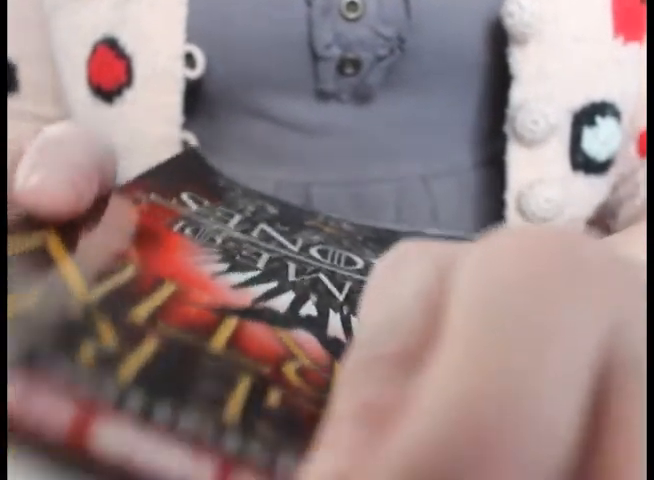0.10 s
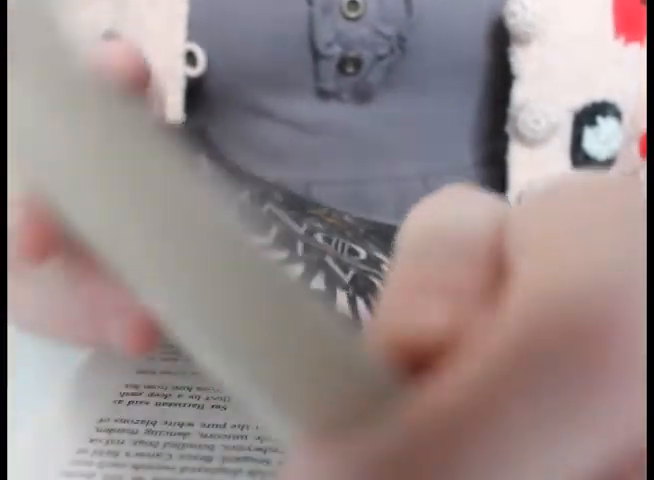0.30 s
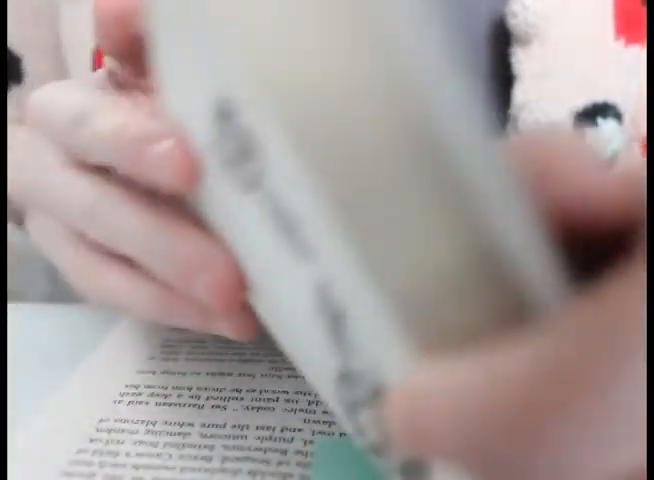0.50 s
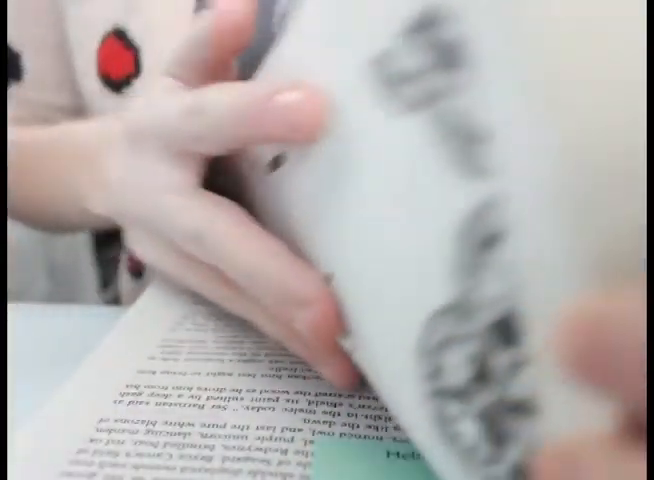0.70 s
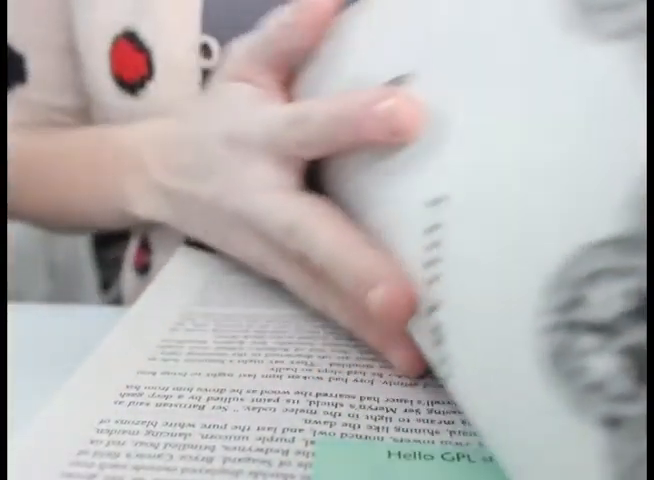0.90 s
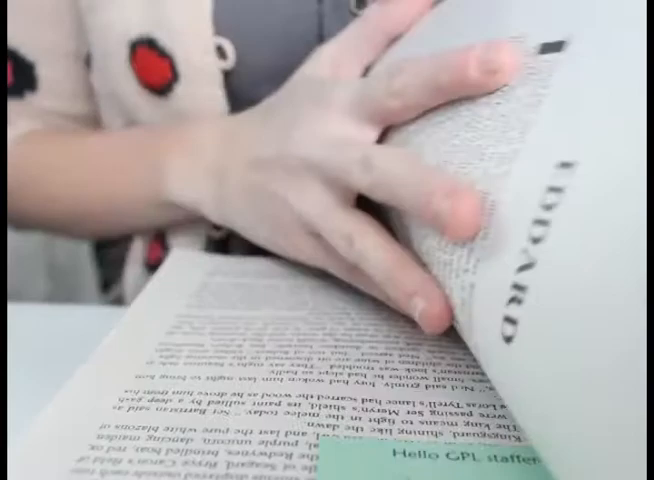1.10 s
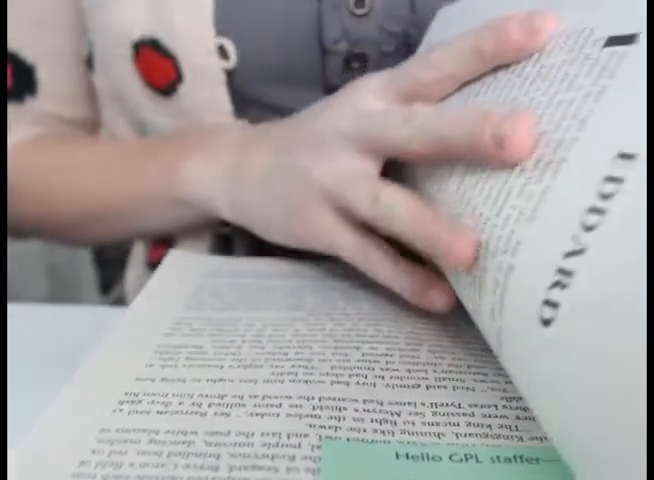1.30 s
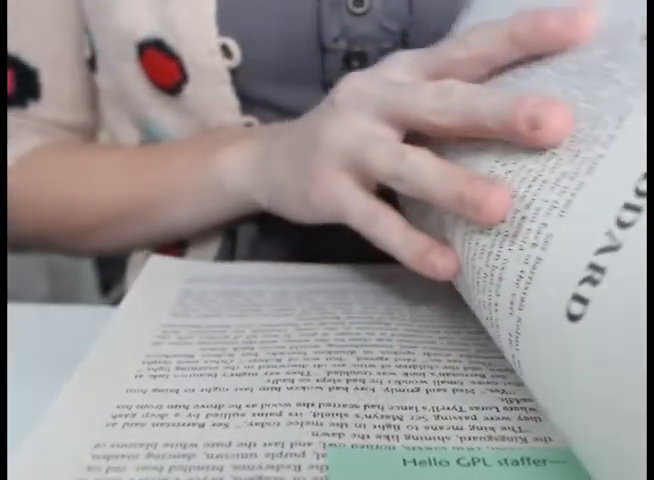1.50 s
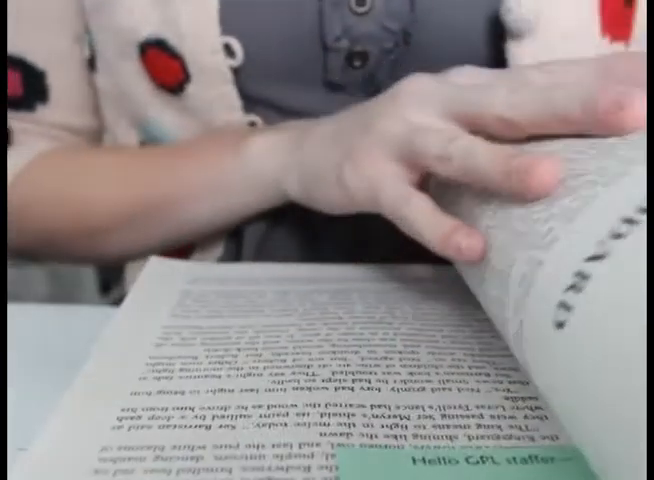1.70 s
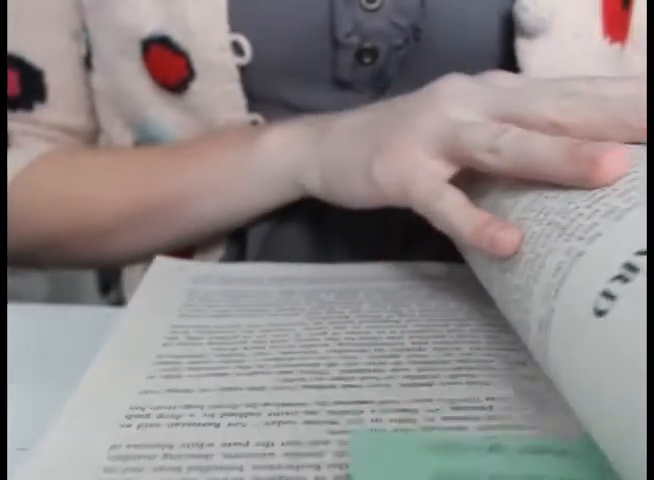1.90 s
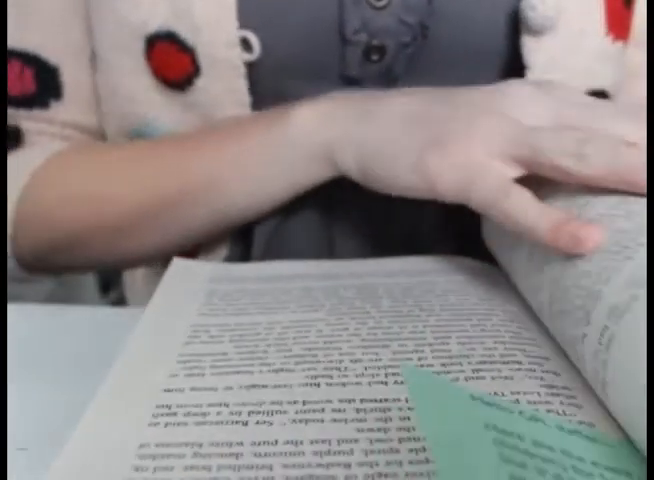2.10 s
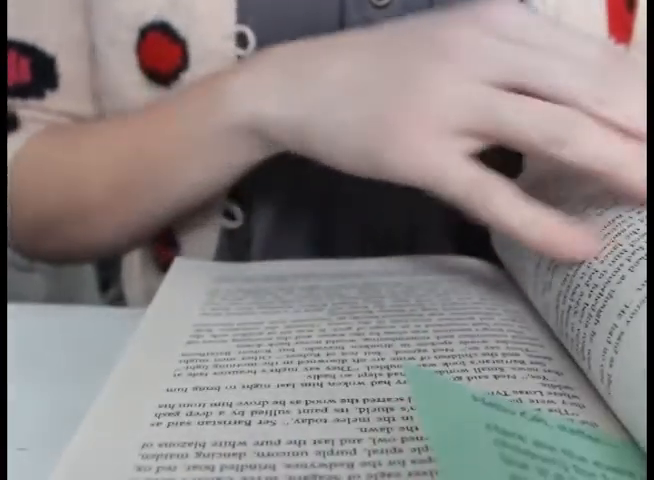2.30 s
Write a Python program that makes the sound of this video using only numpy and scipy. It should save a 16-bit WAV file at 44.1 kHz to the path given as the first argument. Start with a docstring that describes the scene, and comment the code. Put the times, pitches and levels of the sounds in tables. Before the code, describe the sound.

Book pages being turned and smoothed: an early sharp papery clack with a tiny squeak, then grainy sliding strokes, a low thud midway, small taps and a brief edge scrape, over faint steady room noise, close microphone.

```python
"""A quiet room, close to one microphone: a paperback is opened and leafed through.
Fingers and pages slide in soft strokes of grainy noise; page edges scrape as chattering noise bursts.
Taps ring as damped sines with a noise crush, creases tick, and a thin squeak glides down.
Settling pages puff out low noise; a short room tail and a steady noise floor lie behind it all."""
import sys
import numpy as np
from scipy import signal
from scipy.fft import rfft, irfft, next_fast_len
from scipy.io import wavfile
from scipy.ndimage import map_coordinates

SR = 44100
rng = np.random.default_rng(int(sys.argv[2]) if len(sys.argv) > 2 else 0)


def persist_wave(psi):
    """Save psi, clipped to +-1, as 16-bit WAV."""
    counts = np.round(np.clip(psi, -1, 1) * 32767).astype(np.int16)
    wavfile.write(sys.argv[1], SR, np.atleast_2d(counts).T)


N = 103635  # samples, 2.35 s


def amp(db):
    """Decibels to gain."""
    return 10 ** (np.asarray(db) / 20)


def unit(x):
    """Scale to rms 1."""
    return x / np.sqrt(np.mean(x ** 2) + 1e-20)


def filtered(x, response):
    """Shape the spectrum of x with a gain that depends on frequency."""
    m = next_fast_len(N + 8192)
    gain = response(np.fft.rfftfreq(m, 1 / SR))
    return irfft(rfft(x, m) * gain, m)[:N]


def coloured(x, points, tilt_db=0):
    """EQ x along (f/Hz, level/dB) points, tilted in dB per octave, at rms 1; the ends roll off."""
    f, db = np.transpose(points)
    octaves = np.log2(np.r_[f[0] / 2, f, f[-1] * 2])
    db = np.r_[db[0] - 20, db, db[-1] - 20] + tilt_db * octaves

    def response(hz):
        """Straight lines between the points on an octave scale, silent outside."""
        return amp(np.interp(np.log2(hz + 1), octaves, db, left=-300, right=-300))

    return unit(filtered(x, response))


def noise():
    """Plain white noise."""
    return rng.standard_normal(N)


def wobble(rate):
    """A smooth random curve, rate knots a second."""
    knots = rng.standard_normal(int(N * rate / SR) + 4)
    return map_coordinates(knots, [np.arange(N) * rate / SR])


def since(s):
    """Seconds since s, zero before it."""
    return np.maximum(np.arange(N) / SR - s, 0)


def swell(s, rise, hold, fall):
    """Rise, hold and fall of a movement, in straight lines."""
    corners = s + np.cumsum([0, rise, hold, fall])
    return np.interp(np.arange(N) / SR, corners, [0, 1, 1, 0])


def dying(t, t60):
    """Free decay from a contact: 60 dB down after t60 seconds."""
    return (t > 0) * amp(-60 * t / t60)


def ring(t, hz, t60, rise_cycles):
    """One damped mode with a soft start."""
    soft_start = 1 - np.exp(-t * hz / rise_cycles)
    return np.sin(2 * np.pi * hz * t) * dying(t, t60) * soft_start


GRAINS_PER_S, GRAIN_SPREAD_DB = 2000, 2.5
GRAIN_SHARE = 0.38  # part of the power before colouring


def friction():
    """Paper fibres catching at random, over a smooth rush."""
    chance, size, rush = rng.random(N), noise(), rng.standard_normal((2, N))
    caught = chance < GRAINS_PER_S / SR
    catches = caught * amp(GRAIN_SPREAD_DB * size) * np.sign(rush[0])
    return np.sqrt(GRAIN_SHARE) * unit(catches) + np.sqrt(1 - GRAIN_SHARE) * rush[1]


# strokes of fingers and pages: start t/s, rise t/s, hold t/s, fall t/s,
# hollow rub level/dB, paper hiss level/dB, fine fizz level/dB, hiss tilt [dB per octave]
STROKES = [(0.147, 0.088, .15, 0.094, -51.5, -45, -59.5, -3), (0.398, 0.053, 0.18, .12, -51.5, -47, -60, 1),
           (0.597, 0.078, 0.046, .08, -48.5, -47.5, -54, 2.5),
           (0.688, 0.077, 0.058, 0.17, -43, -37, -52.5, -1.4),
           (0.78, .06, 0.043, 0.14, -46.5, -42.5, -57, 3.2),
           (0.966, 0.096, 0.044, 0.086, -45.5, -44.5, -50.5, -0.5),
           (1.11, 0.091, 0.11, 0.22, -69, -45.5, -52, 0.5), (1.246, 0.079, 0.069, 0.02, -39, -50, -57, 1),
           (1.381, 0.056, 0.024, 0.044, -42, -41.5, -52, -0.5),
           (1.464, .03, 0.075, .06, -52, -53.5, -65, -1.5), (1.576, 0.039, 0.017, 0.046, -39, -38, -52, -3),
           (1.594, 0.073, .04, 0.066, -48.5, -42.5, -52.5, 1),
           (1.73, 0.041, 0.048, 0.081, -65, -51, -70, 0), (1.863, 0.036, 0.015, 0.047, -40.5, -41, -64, -5),
           (1.955, 0.085, 0.075, 0.068, -53.5, -49, -56, 0),
           (2.103, 0.043, 0.031, 0.062, -47, -51, -62, -2), (2.287, 0.025, .06, .05, -49, -49.5, -65, 3.5)]
# spectra of the hollow book, the sheet and the fine fizz: f/Hz, level/dB
RUB_SPECTRUM = [(76, -32), (130, -18), (216, -32), (273, -7), (323, -5.5), (488, -4), (632, -3.5), (710, 0),
                (834, -6), (945, -14), (1100, -12), (1430, -13), (2420, -120)]
HISS_SPECTRUM = [(600, -41), (950, -13), (1300, -4), (1550, 0), (2100, -3), (2700, -0.5), (3300, -5),
                 (4300, -5.5), (5500, -11.5), (7500, -24), (14000, -29.5)]
FIZZ_SPECTRUM = [(2500, -12), (5000, -1.5), (7500, 1), (10000, -5.5), (15500, -5.5)]
UNEVEN_DB, UNEVEN_RATE = 1, 55.12  # unsteady finger pressure, knots a second


def slides():
    """Each stroke drives the hollow book, the sheet's hiss and a fine fizz."""
    rub = coloured(friction(), RUB_SPECTRUM)
    fizz = coloured(friction(), FIZZ_SPECTRUM)
    rub_power, fizz_power, hiss = np.zeros((3, N))
    for s, rise, hold, fall, rub_db, hiss_db, fizz_db, tilt in STROKES:
        speed = swell(s, rise, hold, fall)
        # overlapping strokes add in power where they share one noise
        rub_power += (speed * amp(rub_db)) ** 2
        fizz_power += (speed * amp(fizz_db)) ** 2
        hiss += speed * amp(hiss_db) * coloured(friction(), HISS_SPECTRUM, tilt)
    strokes = np.sqrt(rub_power) * rub + hiss + np.sqrt(fizz_power) * fizz
    return strokes * amp(UNEVEN_DB * wobble(UNEVEN_RATE))


# page edges scraping, then slipping free:
# start t/s, rise t/s, hold t/s, fall t/s, level/dB, tilt [dB per octave]
EDGE_SCRAPES = [(0.227, .007, .003, 0.014, -47, 5), (0.271, 0.011, 0.0062, 0.0022, -31, -3),
                (1.881, 0.046, .01, 0.043, -41, 3), (1.911, 0.0087, .003, 0.018, -34, -2),
                (1.923, 0.015, 0.0093, 0.0069, -34.5, -5), (1.946, 0.0055, .002, 0.0053, -38, 4),
                (1.951, 0.0074, 0.0053, 0.019, -46, -5)]
# spectrum of a scraping edge: f/Hz, level/dB
EDGE_SPECTRUM = [(600, -6.5), (1500, -9.5), (2300, -1.5), (3100, -7), (4300, 4), (5500, -2.5), (6700, 3.5),
                 (8500, -3.5), (11000, -7), (15500, -6)]


def scrapes(chatter_db=2.15, chatter_rate=600):
    """Page edges stick and slip until they come free: noise with a fast random chatter in level."""
    out = np.zeros(N)
    for s, rise, hold, fall, db, tilt in EDGE_SCRAPES:
        level = amp(db + chatter_db * wobble(chatter_rate))
        out += swell(s, rise, hold, fall) * level * coloured(noise(), EDGE_SPECTRUM, tilt)
    return out


# thin squeak of the glossy cover: start t/s, length t/s, start f/Hz, end f/Hz, width f/Hz, level/dB
COVER_SQUEAK = (.232, .028, 9300, 7700, 900, -45)


def squeak():
    """Rough, very fast slips whose rate falls as the cover slows: a narrow noise band gliding down."""
    s, length, start_hz, end_hz, width, db = COVER_SQUEAK
    hz = np.interp(since(s), [0, length], [start_hz, end_hz])
    roughness = wobble(2 * width) + 1j * wobble(2 * width)
    slips = np.real(roughness * np.exp(2j * np.pi * np.cumsum(hz) / SR))
    return amp(db) * unit(slips) * swell(s, length / 4, 0, 3 * length / 4)


# taps on cover and pages: t/s, level/dB, pitch f/Hz, t60 t/s, book ring level/dB, paper crush level/dB
PAPER_TAPS = [(0.2245, -13, 1590, 0.011, -22, -19.5), (.2335, -21.5, 650, 0.027, -35, -53),
              (.2368, -16.5, 660, 0.025, -44.5, -48), (0.2717, -22, 600, 0.015, -33, -33),
              (0.2884, -21.5, 1820, 0.011, -51, -31), (0.2987, -23.5, 406, 0.024, -39, -42),
              (0.3024, -25, 780, 0.011, -38, -39), (.79, -32, 1675, 0.041, -57, -36),
              (0.802, -28, 2030, 0.04, -54, -32.5), (.9462, -28, 622, 0.036, -43, -35),
              (0.9472, -37, 1450, 0.011, -53, -28), (.9555, -30, 597, .014, -45, -54),
              (1.0347, -13.5, 354, 0.024, -25.5, -62), (1.095, -33, 634, 0.04, -52, -44),
              (1.4455, -20, 600, 0.007, -48, -42), (1.4628, -16, 570, 0.011, -38, -28),
              (1.516, -27.5, 535, 0.012, -55, -57), (1.618, -33, 1370, 0.011, -43, -41),
              (1.903, -34, 735, 0.044, -50, -43), (1.910, -29.5, 729, 0.09, -51, -37),
              (1.9492, -24, 1970, 0.029, -43, -31.5), (1.994, -32, 650, .018, -60, -47),
              (2.219, -33.5, 600, 0.016, -60, -40)]
# modes of the whole book: f/Hz, level/dB, t60 t/s
BOOK_MODES = [(162, -9, 0.19), (240, -16, 0.047), (397, -14.5, 0.074), (501, -0.5, 0.064), (707, -10, 0.1)]
# spectrum of crushed paper: f/Hz, level/dB
CRUSH_SPECTRUM = [(200, 1.5), (600, 2.5), (1000, 3), (1700, 4.5), (2400, 4.5), (3500, -37), (6000, -26),
                  (15000, -31)]
CRUSH_RISE_S, CRUSH_T60_S = 0.00026, 0.024
CONTACT_CYCLES = 0.25
BOOK_RISE_CYCLES = 1  # the heavy block takes a moment to move


def taps():
    """A touched sheet rings for a few cycles, crushes a little and shakes the whole book."""
    out = np.zeros(N)
    for s, db, hz, t60, book_db, crush_db in PAPER_TAPS:
        t = since(s)
        sheet = ring(t, hz, t60, CONTACT_CYCLES)
        book = np.zeros(N)
        for f, level, decay in BOOK_MODES:
            varied = level + rng.normal(0, 1)  # each tap stirs the modes a little differently
            book += amp(varied) * ring(t, f, decay, BOOK_RISE_CYCLES)
        crush_shape = dying(t, CRUSH_T60_S) * (1 - np.exp(-t / CRUSH_RISE_S))
        crush = coloured(noise(), CRUSH_SPECTRUM) * crush_shape
        out += amp(db) * sheet + amp(book_db) * book + amp(crush_db) * crush
    return out


# crisp creases: t/s, level/dB
PAGE_CREASES = [(0.303, -37), (2.019, -39), (2.0935, -28)]
# spectrum of a crease: f/Hz, level/dB
CREASE_SPECTRUM = [(800, -35), (1500, -15), (2000, 14.5), (3200, -5), (5000, -0.5), (7000, -12),
                   (12000, -3.5), (16000, -17)]
CREASE_T60_S = 0.014


def creases():
    """A bent page gives way with crisp ticks of dying noise."""
    ticks = sum(amp(db) * dying(since(s), CREASE_T60_S) for s, db in PAGE_CREASES)
    return coloured(noise(), CREASE_SPECTRUM) * ticks


# air pushed out by settling pages: t/s, level/dB, centre f/Hz, length t/s
AIR_PUFFS = [(0.231, -39, 189, 0.035), (0.273, -47, 128, 0.054), (1.07, -54, 60, 0.087),
             (1.437, -45, 132, 0.043), (1.879, -38.5, 175, 0.046), (1.952, -39, 287, 0.032),
             (1.98, -51.5, 234, 0.14)]


def puffs(rise_share=0.16):
    """Soft low gusts from pages flopping over: noise around a low centre, quick up and slow down."""
    out = np.zeros(N)
    for s, db, hz, length in AIR_PUFFS:
        air = coloured(noise(), [(hz / 2, -9), (hz, 0), (hz * 2, -14)])
        out += amp(db) * swell(s, rise_share * length, 0, (1 - rise_share) * length) * air
    return out


ROOM_T60_S, ROOM_DB = 0.27, -18


def room(x):
    """The short answer of a furnished room: a dying noise tail that starts 4 ms late."""
    tail = coloured(noise(), [(100, -1), (2000, 12.5), (15000, -7)]) * dying(since(.004), ROOM_T60_S)
    return signal.fftconvolve(x, tail / np.linalg.norm(tail))[:N]


# spectrum of the steady background: f/Hz, level/dB
FLOOR_SPECTRUM = [(12, -18), (20, -5.5), (187, -5), (399, 1), (542, 1), (678, -4), (897, -2.5), (1000, -5),
                  (1660, -8.5), (2200, -5), (2750, -10.5), (3950, -11), (14700, -23), (16000, -17.5)]
FLOOR_DB = -50.5


def floor():
    """The steady noise under everything."""
    return amp(FLOOR_DB) * coloured(noise(), FLOOR_SPECTRUM)


def scene():
    """The book, the room and its steady floor, alike in both channels."""
    book = slides() + scrapes() + squeak() + taps() + creases() + puffs()
    mono = book + amp(ROOM_DB) * room(book) + floor()
    return np.array([mono, mono])


DIP_HZ, DIP_OCTAVES, DIP_DB = 960, 0.089, -3.5  # a narrow hollow in the midrange
TOP_HZ = 15950  # band limit


def record(dry):
    """The midrange is slightly hollow, and nothing is kept above the band limit."""
    def colour(hz):
        """A bell-shaped dip and a sharp cut at the top."""
        distance = np.log2((hz + 1) / DIP_HZ) / DIP_OCTAVES
        return amp(DIP_DB * np.exp(-distance ** 2)) * (hz < TOP_HZ)

    return np.array([filtered(channel, colour) for channel in dry])


dry = scene()
out = record(dry)
persist_wave(out)
```